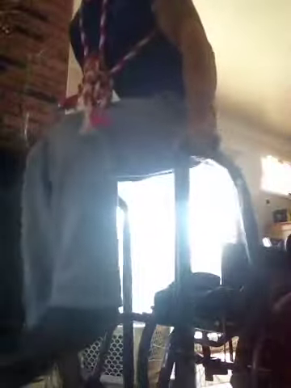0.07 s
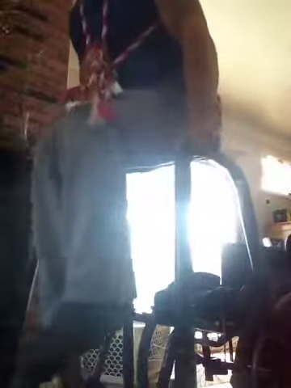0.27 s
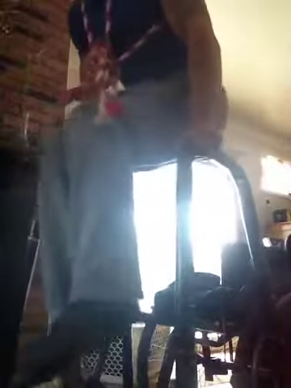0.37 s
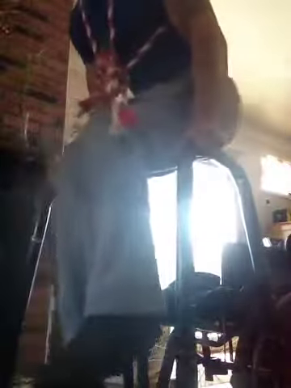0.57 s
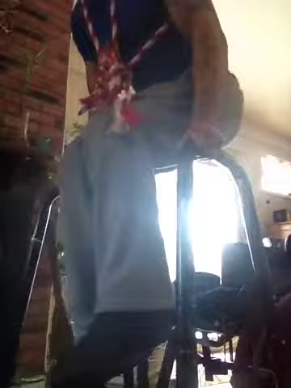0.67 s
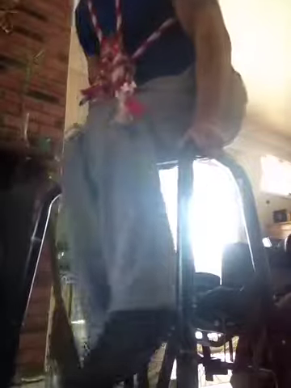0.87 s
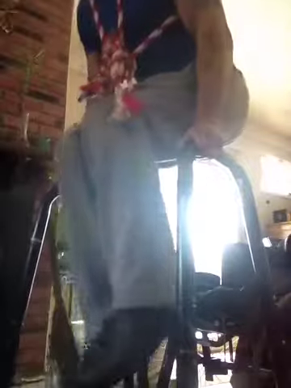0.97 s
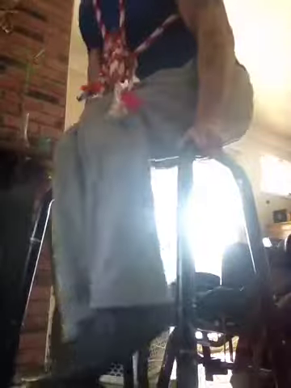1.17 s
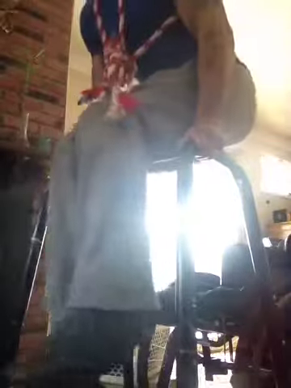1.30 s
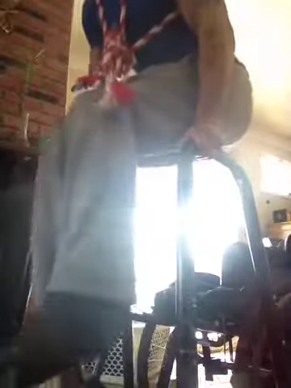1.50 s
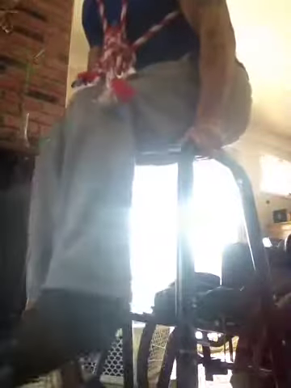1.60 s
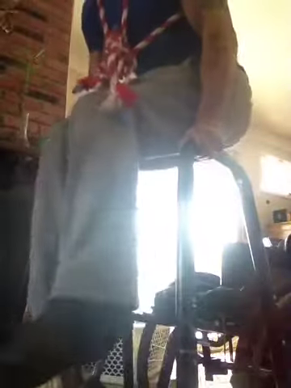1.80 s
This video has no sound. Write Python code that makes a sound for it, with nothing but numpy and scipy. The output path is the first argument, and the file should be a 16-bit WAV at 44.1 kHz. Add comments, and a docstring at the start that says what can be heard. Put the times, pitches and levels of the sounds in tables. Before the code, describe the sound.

A tubular metal frame ticks as someone shifts their weight on it, clatters briefly, then gives a light snap and a sharp clank. Soft thumps and faint hiss lie underneath, heard from nearby in a slightly echoing room.

```python
"""Weight on a tubular metal frame

Someone grips the frame and shifts their weight on it in a live room. Its joints tick under the load,
loose parts clatter once, then come a light snap and a sharp clank: noise bursts that set metal ringing.
Dull thumps and soft knocks come with the movement, over quiet room air and an appliance's hum."""
import sys
import numpy as np
from scipy import signal
from scipy.fft import rfft, irfft
from scipy.io import wavfile
from scipy.ndimage import uniform_filter1d, map_coordinates

SR = 44100
rng = np.random.default_rng(int(sys.argv[2]) if len(sys.argv) > 2 else 0)


def log_audio(samples):
    """Write samples as a 16-bit WAV file to the path given in sys.argv[1]."""
    # one column per channel
    frames = np.atleast_2d(samples).T
    # limit to full scale, then quantise
    limited = np.clip(frames, -1, 1)
    pcm = np.round(limited * 32767).astype(np.int16)
    wavfile.write(sys.argv[1], SR, pcm)


N = 81585
T = np.arange(SR) / SR  # one second for each hit to die away
HZ = np.fft.rfftfreq(2 * SR, 1 / SR)

# Tone of the room's low air and thin hiss. Each row: frequency in Hz, relative level in dB.
AIR_EQ = [(25, -40), (221, -9), (312, -11.5), (468, -15.5), (515, -13.5), (624, -17), (2500, -22.5),
          (3250, -61), (5500, -120)]
HISS_EQ = [(1500, -9), (2800, 1.5), (4000, 1.5), (5500, 6.5), (7000, -2.5), (9800, -11), (12500, -4),
           (15500, -6)]
# The appliance's hum. Each row: frequency in Hz, level in dB.
HUM_TONES = [(253, -95), (479, -74)]
# How long the room rings. Each row: frequency in Hz, 60 dB decay time in seconds.
ROOM_DECAY = [(100, 1), (300, 0.34), (1000, 0.49), (3000, 0.52), (5500, 0.4), (8000, 0.39), (14000, 0.24)]

# Thumps of shifting weight. Each row: start in seconds, level in dB, contact decay time in seconds,
# boom pitch in Hz.
THUMP_HITS = [(.01, -60.5, 0.55, 200), (.075, -55.5, 0.13, 194), (0.124, -56.5, 0.4, 270),
              (0.242, -53, 0.043, 193.5), (0.362, -54, 0.2, 252.5), (0.473, -53.5, 0.28, 215),
              (0.593, -60.5, 0.075, 156.5), (0.679, -60.5, 0.084, 160), (0.787, -64, 0.17, 153),
              (1.283, -59.5, 0.15, 127)]
# Soft knocks. Each row: start in seconds, level in dB, contact decay time in seconds.
KNOCK_HITS = [(0.685, -58.5, 0.41), (.7866, -58, 0.067), (1.167, -59, 0.067)]
# Metal on metal. Each row: start in seconds, level in dB, contact decay time in seconds,
# low-mid gain in dB, treble gain in dB, ring level in dB, favoured ring frequency in Hz.
TICK_HITS = [(.0199, -36.5, 0.026, 3, -3, -19, 5200), (.039, -41, 0.35, 3, -0.5, -19, 2885),
             (.1221, -35, 0.021, 3.5, -0.5, -10, 5500), (.172, -47.5, 0.014, -5, 1, -14, 5690),
             (.2433, -39, 0.021, 6, -2.5, -17, 3335), (.4633, -33, 0.047, -18, 7, -21, 3950),
             (.481, -34.5, 0.045, -4, 4, -9.5, 4965), (.496, -41, 0.042, 5, 9, -24, 5690),
             (.508, -54, 0.022, 0, 7, -16, 4965), (.815, -51.5, 0.11, 4, 3, -5, 2885),
             (.9368, -47, 0.092, 4, -2.5, -5.5, 3950), (1.8223, -58.5, 0.17, 3, -2, -7, 4270)]
CLATTER_HITS = [(.303, -32, 0.077, -31, 2.5, -25, 4150), (.311, -33.5, 0.079, -1, 6.5, -30, 5418),
                (.3315, -24.5, 0.059, -2.5, 1, -11, 2010), (.335, -26.5, 0.047, 5, 10.5, -11.5, 5104),
                (.347, -24, 0.064, -7.5, 0, -21.5, 5715), (.364, -33, 0.027, 6, -3, -16, 5418),
                (.376, -34.5, 0.082, 7.5, 5, -31, 3400)]
SNAP_HITS = [(1.0283, -36.5, 0.028, -4, 3.5, -8, 7472)]
CLANK_HITS = [(1.5616, -28, 0.032, -0.5, 1.5, -12.5, 3470), (1.591, -40.5, 0.057, 9, 3, -9.5, 2767)]

# Tone of each kind of contact. Each row: frequency in Hz, relative level in dB.
THUMP_EQ = [(40, -42), (70, -18), (105, -8.5), (150, -11.5), (195, 1.5), (225, -4), (265, 2), (320, -17.5),
            (600, -20), (1500, -41), (5000, -62)]
TICK_EQ = [(210, -40.5), (350, -16), (572, -6.5), (681, -9), (1190, -7.5), (2450, -16), (2900, -7.5),
           (4570, -3.5), (5440, 1.5), (6200, -9), (6800, -15.5), (14500, -37.5), (15500, -28)]
CLATTER_EQ = [(200, -50), (400, -29), (650, -14.5), (950, -10.5), (1250, -8.5), (1550, -11), (2020, -10),
              (2500, -14), (3400, -4), (4700, -5.5), (5100, 3), (5700, -1.5), (7600, -14), (8450, -13),
              (9600, -24.5), (11700, -17), (13000, -26), (15500, -29)]
KNOCK_EQ = [(60, -23), (400, -5), (800, 1.5), (945, 5), (1100, -2.5), (2100, -7), (3000, -7), (6000, -4),
            (12000, -62)]
SNAP_EQ = [(150, -43), (1000, -1.5), (1550, -1.5), (2300, -10.5), (2700, -2.5), (4000, -3), (4700, -2.5),
           (5900, 5.5), (6700, -14), (7500, -3), (9000, -24.5), (12500, -13), (15500, -32)]
CLANK_EQ = [(70, -71), (250, -22), (450, -26), (700, -12), (1100, -15), (1550, -10), (2450, -15),
            (3500, -4.5), (4000, -11), (4400, -1.5), (5650, 0), (6150, -8), (10000, -23), (15500, -23.5)]

# Partials of each struck part. Each row: frequency in Hz, relative level in dB, decay time in seconds.
JOINT_MODES = [(2885, -11, .52), (3165, -13, .5), (3335, -7, .5), (3950, -6, .25), (4270, -6, .25),
               (4965, -2, .22), (5430, -2, .22), (5512, -2, .2), (5690, -1, .26)]
FRAME_MODES = [(1130, -1, .12), (1987, 1, .14), (2037, 3, .13), (3400, -2, .38), (3853, -4, .35),
               (4120, -3, .35), (5104, -1, .3), (5418, 0, .3), (5577, -2, .16), (5715, -2, .26),
               (6272, -4, .2), (8120, -1, .15), (8470, 1, .16), (11540, -9, .14)]
SNAP_MODES = [(1550, -2, .09), (2680, 2, .08), (3400, 0, .09), (4005, -4, .25), (5749, 0, .15),
              (7472, -7, .085)]
CLANK_MODES = [(700, -8, .15), (942, -10, .35), (2767, -17, .65), (3257, -9, .3), (3520, -11, .13),
               (4340, -1, .2), (4500, -4, .3), (4660, -7, .4), (5539, 1, .26)]

ATTACK_S, ROOM_BUILD_S = 0.00033, 0.0055
WALLS_DB, WALL_LOSS_DB_PER_S = -13.5, 127
LOW_MID_HZ, TREBLE_HZ, TOP_HZ = 2180, 6730, 15700


def amp(db):
    return 10 ** (np.asarray(db) / 20)


def unit_rms(x):
    return x / np.sqrt(np.mean(x ** 2) + 1e-20)


def curve(points, hz):
    """Join (Hz, value) points along a log frequency axis."""
    point_hz, values = np.transpose(points)
    return np.interp(np.log(hz + 1), np.log(point_hz + 1), values)


def eq_gain(eq):
    """Turn (Hz, dB) points into a gain curve of rms 1."""
    return unit_rms(amp(curve(eq, HZ)))


def add(track, start_s, x):
    """Mix x into the track at start_s."""
    part = track[max(0, round(start_s * SR)):][:len(x)]
    part += x[:len(part)]


def filtered(x, gain):
    """Minimum-phase EQ, so nothing rings ahead of the attack."""
    cepstrum = irfft(np.log(np.maximum(gain, 1e-6)))
    cepstrum[1:SR] *= 2
    cepstrum[SR + 1:] = 0
    return irfft(rfft(x, 2 * SR) * np.exp(rfft(cepstrum)))[:SR]


def room_tone(air_db=-68.5, hiss_db=-66.5, air_top_hz=2720):
    """The bed: low room air, a thin hiss and the faint hum of an appliance."""
    def noise(gain):
        return unit_rms(irfft(rfft(rng.standard_normal(2 * SR)) * gain)[:N])

    t = np.arange(N) / SR
    air = noise(eq_gain(AIR_EQ) / (1 + (HZ / air_top_hz) ** 4))
    hum = sum(amp(db) * unit_rms(np.sin(2 * np.pi * (hz * t + rng.random()))) for hz, db in HUM_TONES)
    hiss = noise(eq_gain(HISS_EQ))
    return amp(air_db) * air + amp(hiss_db) * hiss + hum


def wall_reflections(x, count=14):
    """The direct sound and its early reflections, the later ones weaker."""
    out = x.copy()
    for delay_s, sign in zip(rng.uniform(.003, .035, count), rng.choice([-1, 1], count)):
        add(out, delay_s, amp(WALLS_DB - WALL_LOSS_DB_PER_S * delay_s) * sign * x)
    return out


def room_tail():
    """Diffuse reverb: it blooms quickly, then each frequency dies at its own speed."""
    hz, t, spectrum = signal.stft(rng.standard_normal(SR), SR, nperseg=256)
    decay = amp(-60 * t / curve(ROOM_DECAY, hz)[:, None])
    tail = signal.istft(spectrum * decay, SR, nperseg=256)[1][:SR]
    return tail * (1 - np.exp(-T / ROOM_BUILD_S))


def contact(gain, room_db, t60, chatter_db=-1.5):
    """One contact: a chattering noise burst, coloured by the part and answered by the room."""
    chatter = amp(chatter_db * unit_rms(uniform_filter1d(rng.standard_normal(SR), size=24)))
    envelope = amp(-60 * T / t60) * (1 - np.exp(-T / ATTACK_S))
    burst = unit_rms(rng.standard_normal(SR) * chatter * envelope) * np.sqrt(np.mean(envelope ** 2))
    return filtered(wall_reflections(burst) + amp(room_db) * room_tail(), gain)


def weight_thumps(boom_db=7.5, boom_t60=0.16, boom_rise_s=0.016):
    """Shifting weight lands in dull thumps, each raising a short low boom."""
    out = np.zeros(N)
    boom_envelope = amp(boom_db - 60 * T / boom_t60) * (1 - np.exp(-T / boom_rise_s))
    for start_s, db, t60, boom_hz in THUMP_HITS:
        thud = contact(eq_gain(THUMP_EQ), room_db=-6, t60=t60)
        boom = boom_envelope * np.sin(2 * np.pi * boom_hz * T)
        add(out, start_s, amp(db) * (thud + boom))
    return out


def dense_resonances(ripple_db=2.7, width_hz=60):
    """A part's many damped, overlapping resonances put random peaks and dips in its tone."""
    knots = rng.standard_normal(int(HZ[-1] / width_hz) + 4)
    ripple = np.clip(map_coordinates(knots, [HZ / width_hz]), -2, 2)
    depth_db = ripple_db * HZ / (HZ + 500)  # smoother in the bass
    gain = amp(depth_db * ripple)
    return gain / np.sqrt(uniform_filter1d(gain ** 2, size=1600))  # hold the broad balance


def metal_ring(modes, main_hz, favour_db=10, width_hz=160):
    """Decaying partials, varied at every blow; the point of contact favours those near main_hz."""
    out = np.zeros(SR)
    for hz, db, t60 in modes:
        boost_db = favour_db * np.exp(-((hz - main_hz) / width_hz) ** 2)
        envelope = amp(db + boost_db + rng.standard_normal() - 60 * T / t60)
        out += envelope * np.sin(2 * np.pi * (hz * T + rng.random()))
    return out * (1 - np.exp(-T / ATTACK_S)) / 2


def contact_tilt(low_db, treble_db):
    """Two shelves: how a contact's hardness and place weigh the low mids and the treble."""
    low_shelf = 1 / (1 + (HZ / LOW_MID_HZ) ** 4)
    high_shelf = 1 - 1 / (1 + (HZ / TREBLE_HZ) ** 8)
    return amp(low_db * low_shelf + treble_db * high_shelf)


def metal_hits(hits, eq, modes, room_db):
    """Metal on metal: each contact sounds through the same part and sets its partials ringing."""
    out = np.zeros(N)
    part_gain = eq_gain(eq) * dense_resonances()
    for start_s, db, t60, low_db, treble_db, ring_db, main_hz in hits:
        ring = amp(ring_db) * metal_ring(modes, main_hz)
        strike = contact(part_gain, room_db, t60)
        add(out, start_s, amp(db) * filtered(strike + ring, contact_tilt(low_db, treble_db)))
    return out


def joint_ticks():
    """The joints tick under the load, each with a thin, high ring."""
    return metal_hits(TICK_HITS, TICK_EQ, JOINT_MODES, room_db=-9.5)


def loose_clatter():
    """Loose parts strike the frame in one quick, bright flurry."""
    return metal_hits(CLATTER_HITS, CLATTER_EQ, FRAME_MODES, room_db=-8.5)


def soft_knocks():
    """Soft midrange contacts that come with the movement, with plenty of room on them."""
    out = np.zeros(N)
    for start_s, db, t60 in KNOCK_HITS:
        add(out, start_s, amp(db) * contact(eq_gain(KNOCK_EQ), room_db=1, t60=t60))
    return out


def light_snap():
    """A small, light part snaps into place and rings briefly."""
    return metal_hits(SNAP_HITS, SNAP_EQ, SNAP_MODES, room_db=-10)


def sharp_clank():
    """One hard metal blow and its quieter rebound."""
    return metal_hits(CLANK_HITS, CLANK_EQ, CLANK_MODES, room_db=-13.5)


def scene():
    """Bright metal up front, soft movement beneath it and the room behind, in mono."""
    metal = joint_ticks() + loose_clatter() + light_snap() + sharp_clank()
    movement = soft_knocks() + weight_thumps()
    return (metal + movement + room_tone())[None]


def record(dry):
    """A brick-wall high cut at TOP_HZ."""
    return irfft(rfft(dry, 2 * SR) * (HZ < TOP_HZ))[:, :N]


dry = scene()
out = record(dry)
log_audio(out)
```